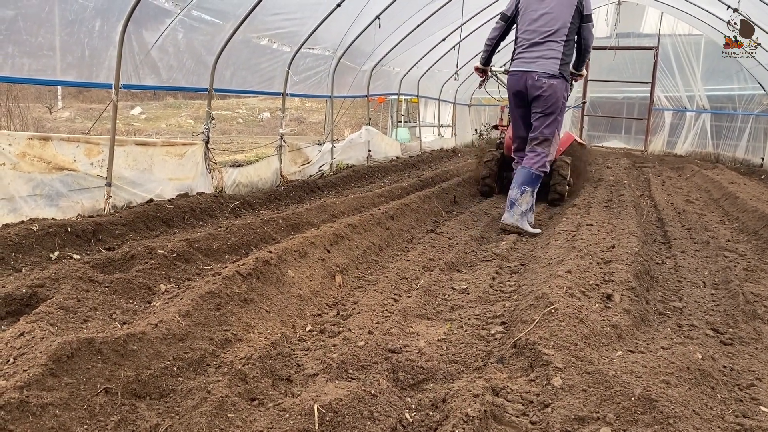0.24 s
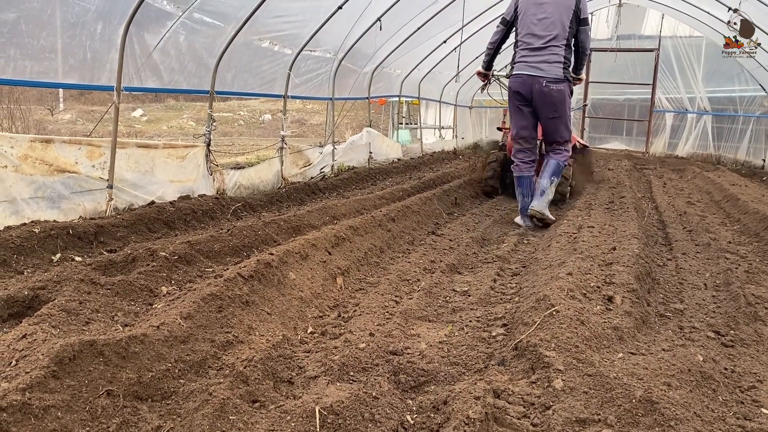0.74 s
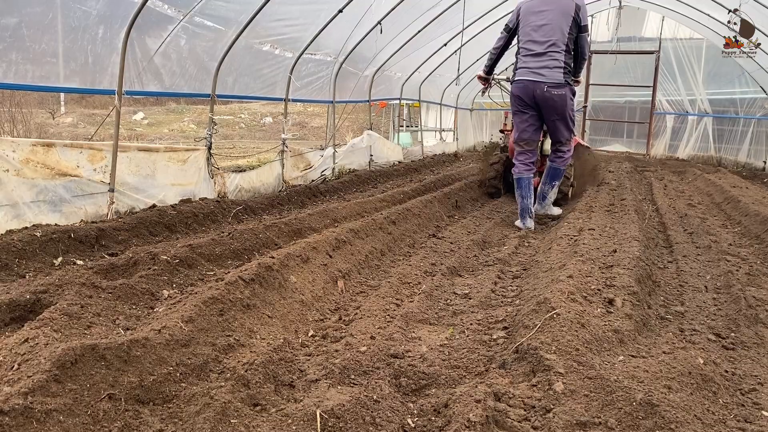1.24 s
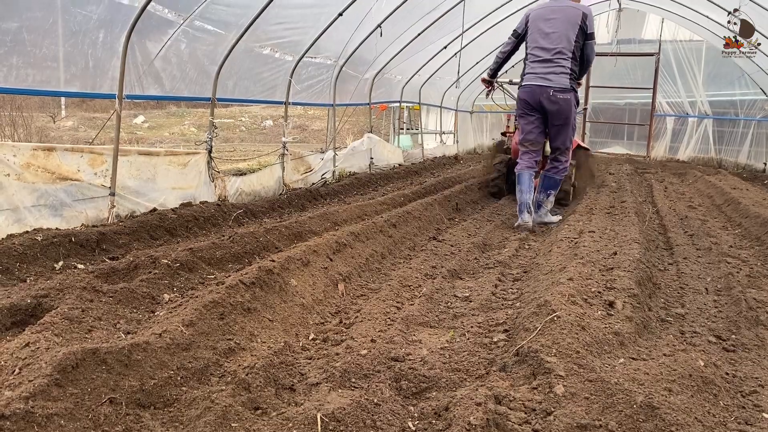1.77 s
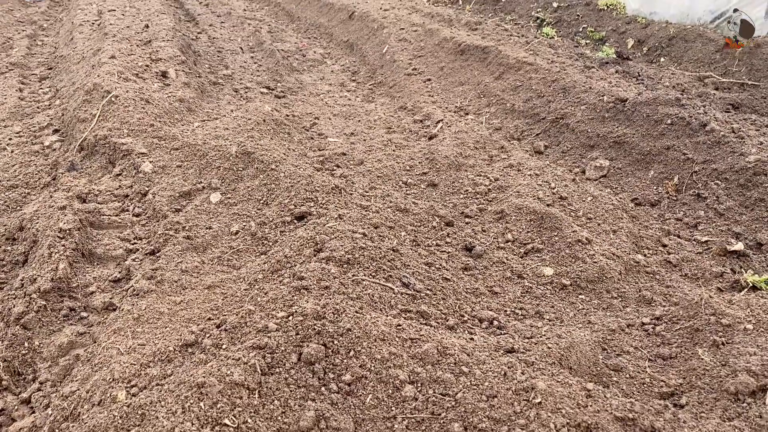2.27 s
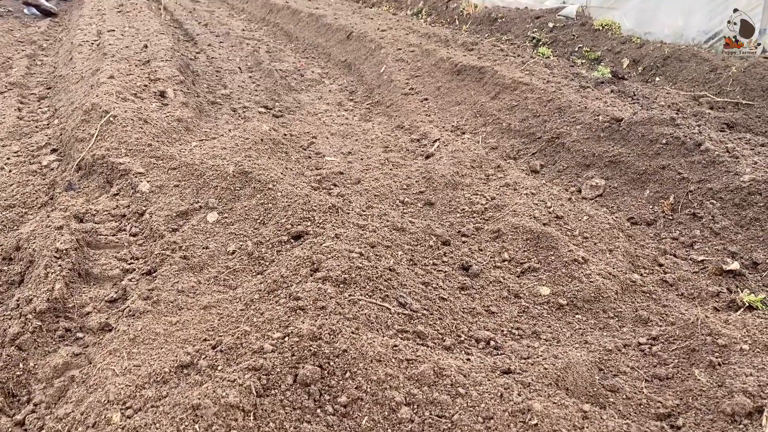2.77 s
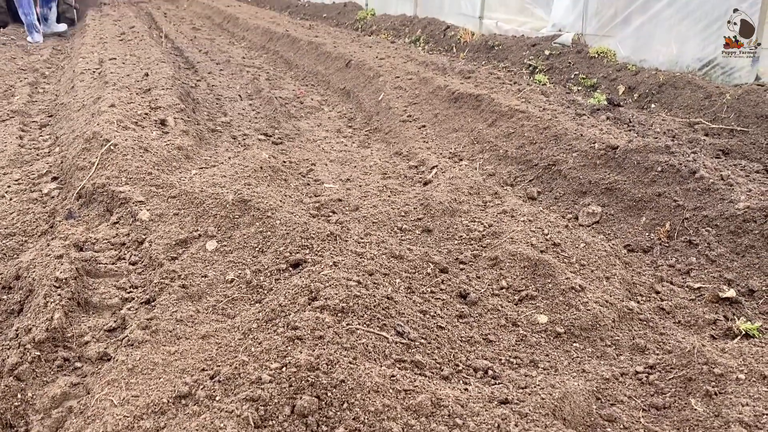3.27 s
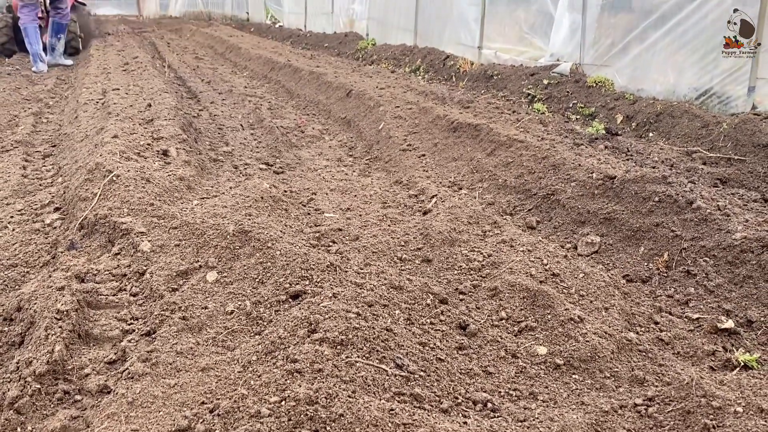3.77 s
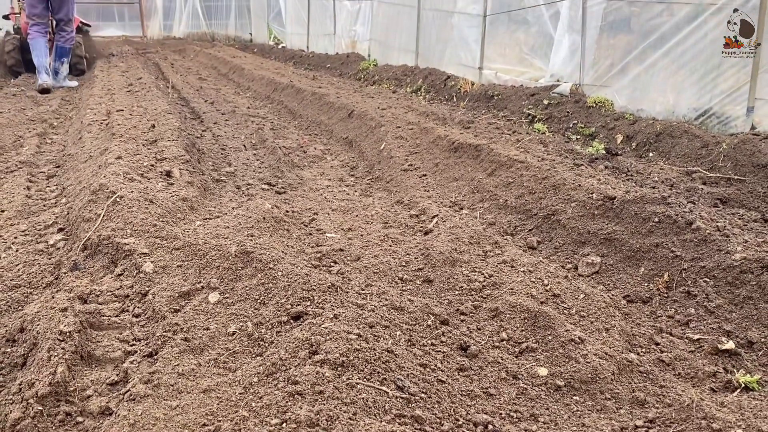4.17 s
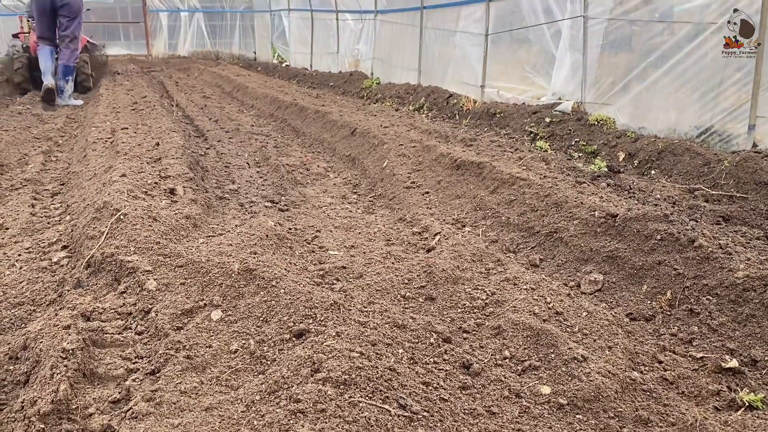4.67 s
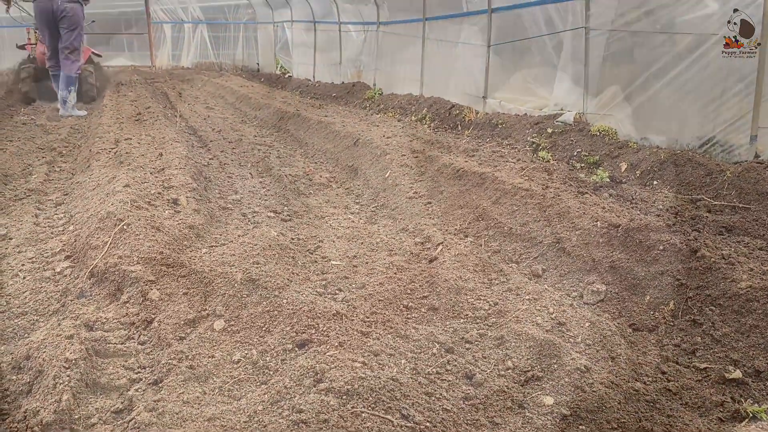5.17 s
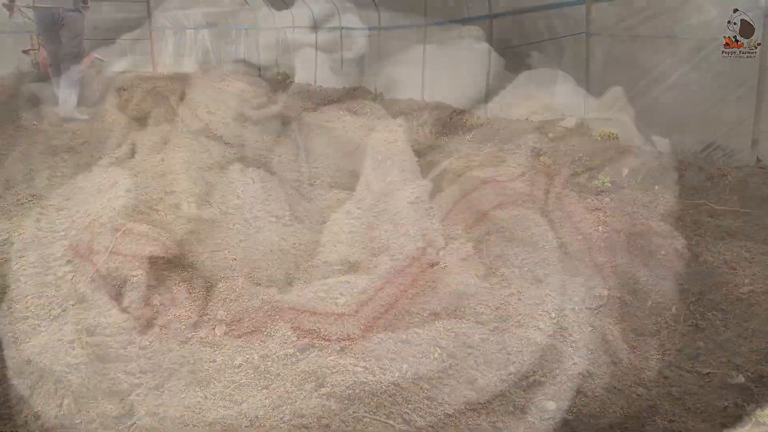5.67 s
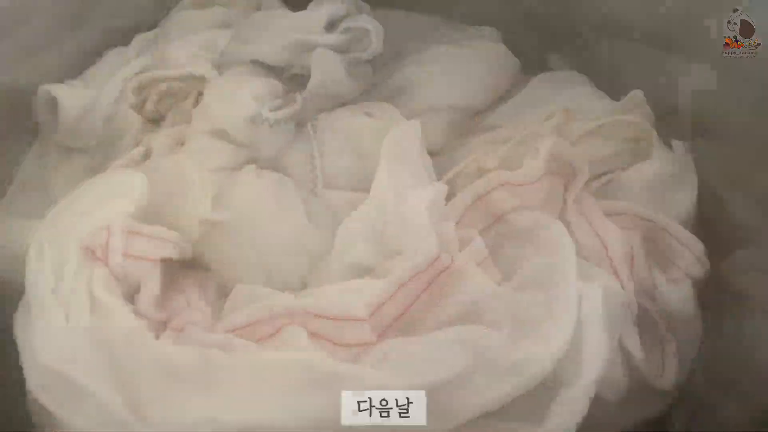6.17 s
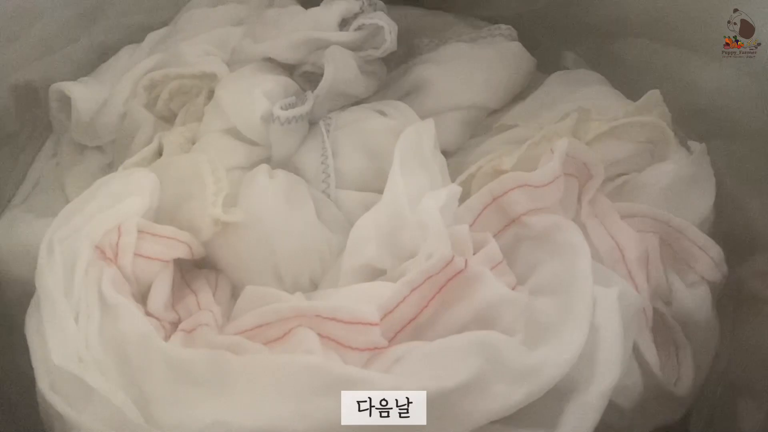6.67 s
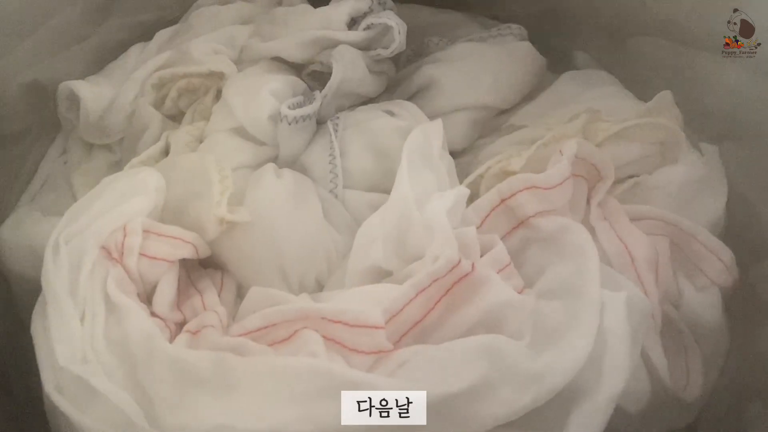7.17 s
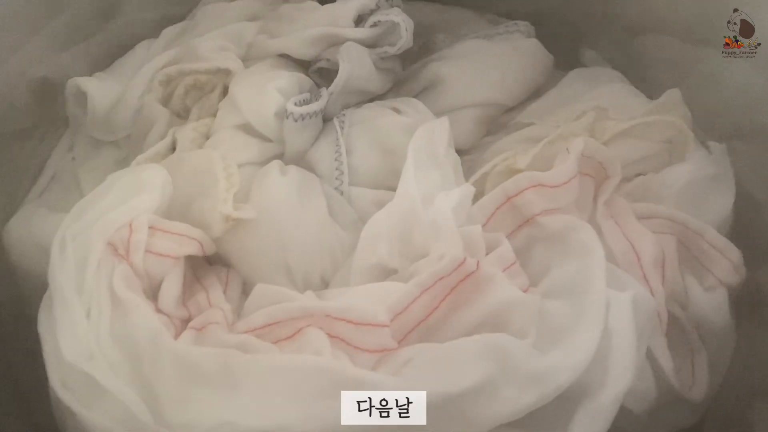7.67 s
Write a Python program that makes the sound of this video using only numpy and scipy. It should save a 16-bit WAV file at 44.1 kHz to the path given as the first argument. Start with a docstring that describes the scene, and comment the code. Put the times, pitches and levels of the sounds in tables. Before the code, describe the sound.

A one-cylinder petrol tiller runs steadily inside a plastic greenhouse, heard from behind: low rapid puttering, loose metal clatter, gas hiss, gear whine, small chirps and stones ticking on the tines. At about two seconds the view changes and it sounds a bit farther away, less hissy. At six seconds it stops at a cut, leaving a very quiet room with low appliance hum, airy noise and a few soft knocks.

```python
"""A plastic greenhouse: a one-cylinder four-stroke tiller works the soil, the microphone behind it, then, after
a cut, further off; a second cut leads to a quiet room with a humming appliance and soft knocks.
Each firing booms as an impulse through silencer and tunnel resonances; struck modes and pulsed noise make
block, clatter, casing and drone. Gas is puffing noise, gears whine as narrow noise and sung tones,
a belt chirps as a wavering sine, and stones on the tines are short noise bursts."""
import sys
import numpy as np
from scipy import signal
from scipy.fft import rfft, irfft, next_fast_len
from scipy.io import wavfile
from scipy.ndimage import uniform_filter1d

SR = 44100
rng = np.random.default_rng(int(sys.argv[2]) if len(sys.argv) > 2 else 0)


def store_pcm(level_fs):
    """Save levels as 16-bit WAV."""
    pcm = np.round(np.clip(level_fs, -1, 1) * 32767).astype(np.int16)
    wavfile.write(sys.argv[1], SR, np.atleast_2d(pcm).T)


N = 349256  # samples
T = np.arange(N) / SR
SIZE = next_fast_len(N + SR // 4)  # room after the end for ringing and delays
F = np.maximum(np.arange(SIZE // 2 + 1) * SR / SIZE, 1)  # Hz

# Start of each place [s]: near the tiller, far from it, in the room
PLACE_STARTS_S = (0, 2.062, 6.064)
# Span in which the room level dips by 30 dB [s]
DIP_S = (6.507, 6.528)
# All pairs of settings below are near, far.

# Mean firing rate as the soil load drifts, near and far: (time [s], rate [Hz])
FIRING_RATE = [
    [(0.0, 23.16), (0.55, 22.77), (0.71, 23.32), (1.07, 22.75), (1.33, 23.13), (1.48, 22.91), (2.05, 22.99)],
    [(2.08, 22.82), (2.69, 22.92), (2.84, 22.83), (3.03, 23.12), (3.52, 22.89), (4.19, 23.23),
     (4.57, 22.75), (4.84, 23.13), (5.43, 22.96), (5.58, 22.76), (6.05, 23.25)],
]
# Each bite of the tines drags the engine down sharply and lets it climb back
BITES_PER_S, BITE_SWING_HZ, BITE_SKEW_HZ = 3.044, 0.36, 0.14
BITE_TURN = (0.641, 0.144)  # share of the bite at 0 s
START_TURN = (0.287, 0.25)  # share of the engine cycle gone as each place starts

# Boom of silencer and tunnel, near and far: (frequency [Hz], width [Hz], level [dB], delay [ms])
BOOM_MODES = [
    [(50.3, 22.0, -48.4, 12.31), (101.6, 23.2, -31.3, 6.44), (135.8, 36.6, -35.1, 3.12),
     (175.0, 44.4, -42.3, 1.44), (219.4, 52.2, -39.6, 7.61), (276.2, 33.4, -49.2, 0.06),
     (325.1, 43.9, -60.9, 10.0)],
    [(47.9, 22.0, -49.8, 12.74), (109.8, 22.0, -30.6, 9.39), (129.1, 36.7, -32.9, 18.05),
     (215.0, 90.1, -50.7, 8.57), (234.0, 41.2, -44.6, 4.92), (274.0, 29.0, -50.3, 0.83),
     (349.4, 100.0, -59.6, 14.94)],
]
FIRING_DB = (0.65, 0.53)
# Block modes struck by valves and piston, near and far: (frequency [Hz], width [Hz], level [dB])
BLOCK_MODES = [
    [(532, 160, -69.5), (675, 38, -65), (966, 81, -57)],
    [(536, 85, -62), (703, 160, -67.5), (939, 84, -65.5)],
]
# Strikes of valves and piston: (point in the cycle [share], level [dB])
BLOCK_STRIKES = [(.10, 1.5), (0.582, -3.5)]

# Colour of the clatter, near and far: (frequency [Hz], relative level [dB per Hz])
CLATTER_COLOUR = [
    [(30, -22), (60, -2), (250, 3.5), (340, -5.5), (430, -13.5), (600, -2), (800, -2.5), (1300, 4),
     (2100, 3), (2800, -9.5), (4000, -50)],
    [(30, -16), (60, 4.5), (250, -7), (340, -1.5), (430, -25), (600, -3.5), (800, 0), (1300, 0),
     (2100, -4.5), (2800, -9.5), (4000, -36)],
]
CLATTER_DB = (-38.5, -39)
# Casing modes that rattle on and off, near and far: (frequency [Hz], width [Hz], level [dB rms])
CASING_MODES = [
    [(697, 79, -55), (1592, 190, -63), (2836, 430, -50.5), (4360, 70, -54), (6040, 73, -56.5),
     (7000, 200, -75), (7950, 100, -73), (8440, 47, -55), (10150, 120, -60), (12800, 300, -62),
     (15000, 250, -68)],
    [(535, 105, -55.5), (2518, 140, -52), (2863, 90, -53.5), (3686, 440, -52), (6130, 55, -63.5),
     (8080, 120, -62), (8550, 54, -64), (10120, 510, -62), (12080, 150, -65), (15200, 150, -82)],
]

# Colour of the gas hiss, near and far: (frequency [Hz], relative level [dB per Hz])
HISS_COLOUR = [
    [(1500, -7), (2800, -2), (4500, -6.5), (6000, -10), (8000, -11.5), (10500, -19), (15500, -22)],
    [(1500, -8), (2800, 1), (4000, -0.5), (5200, -3.5), (7500, -10), (10500, -18), (15500, -18.5)],
]
# Level of the hiss, near and far: (time [s], level [dB])
HISS_LEVEL = [
    [(0.0, -38), (0.2, -38), (0.43, -34.5), (0.52, -39), (1.2, -37), (1.7, -35.5), (1.85, -39),
     (2.06, -37.5)],
    [(2.07, -42.5), (4.0, -42), (6.06, -42)],
]

# Level of the cover drone, near and far: (time [s], level [dB])
DRONE_LEVEL = [
    [(0.0, -44.5), (0.85, -42.5), (1.4, -47.5), (1.6, -44), (2.06, -52)],
    [(2.07, -47), (2.6, -51.5), (4.8, -57), (5.0, -45), (5.3, -54), (5.7, -49), (6.06, -46)],
]
DRONE_HZ, DRONE_WANDER_DB = 990, 2.0

WHINE_HZ, WHINE_DB, WHINE_WANDER_DB = 1971, (-48, -48.5), 0.5
# Spells of clear gear tone, before flutter:
# (middle [s], length [s], frequency [Hz], level [dB rms])
GEAR_SINGING = [(0.3, 0.51, 1930, -44), (0.658, 0.21, 1990, -44.5), (3.28, 0.45, 1935, -42.5),
                (3.68, 0.2, 1975, -45), (3.9, 0.27, 1940, -44), (4.196, 0.32, 1960, -43),
                (4.52, 0.36, 1927, -45), (5.62, 0.2, 1920, -44)]

# Faint squeal that stays under the chirps
SQUEAL_HZ, SQUEAL_DB, SQUEAL_WANDER_DB = 6560, (-62, -65), 2
# Belt chirps, before flutter: (middle [s], length [s], level [dB])
BELT_CHIRPS = [(0.234, 0.09, -52), (0.48, 0.07, -55), (0.973, 0.05, -53), (1.388, 0.062, -43),
               (1.6, 0.06, -49), (1.702, 0.11, -52), (1.793, 0.039, -49), (2.494, 0.06, -52),
               (2.63, 0.07, -54), (2.813, 0.1, -55), (2.94, 0.05, -54), (3.378, 0.05, -54),
               (3.559, 0.067, -42.5), (3.684, 0.11, -46.5), (3.836, 0.18, -59), (4.167, 0.051, -58),
               (4.49, 0.091, -57), (5.402, 0.046, -56), (5.758, 0.14, -55)]

# Stones on the tines: (time [s], noise level at onset before the resonance [dB])
STONE_HITS = [(0.0423, -30), (0.0852, -35), (0.3531, -29), (0.4055, -28.5), (0.4704, -34), (0.5901, -29),
              (0.7407, -29.5), (0.8121, -38.5), (1.565, -29.5), (1.682, -25), (1.9135, -34), (3.3952, -29),
              (5.372, -38)]

# Colour of the room air: (frequency [Hz], relative level [dB per Hz])
AIR_COLOUR = [(40, -10), (90, -6), (125, 4.5), (180, -6.5), (300, -1), (600, -3), (1000, -10.5),
              (1800, -19), (2600, -17.5), (3100, -19.5), (3800, -17), (5500, -22.5), (6500, -27.5),
              (12000, -33.5), (16000, -40)]
AIR_DB = -60
# Appliance hum, around which its level wanders: (frequency [Hz], level [dB rms])
APPLIANCE_HUM = [(285.3, -64), (1427, -80)]
# Soft knocks in the room: (time [s], strike level before the modes [dB])
ROOM_KNOCKS = [(6.581, -51), (6.766, -52.5), (7.048, -60), (7.483, -50.5), (7.546, -50.5)]
# Modes that the knocks excite: (frequency [Hz], width [Hz], level [dB])
KNOCK_MODES = [(318, 180, -3.5), (734, 390, -2.5), (1400, 1100, -12)]
FAINT_KNOCKS_PER_S, FAINT_KNOCK_DB = 55, -67

# Between the microphone ports, for each of the three places:
# (frequency [Hz], likeness [0-1], left minus right [dB], left lead [rad])
MIC_PORTS = [
    [(250, 0.87, -1.5, 0.16), (690, 0.78, -1.5, 0.069), (1270, 0.65, 2.5, 0), (2800, 0.77, 2.5, 1),
     (5000, 0.48, 5, 0), (6880, 1, 0, 0.017)],
    [(61.5, 0.99, 1, 0), (247, 0.51, -6, 0.43), (703, 1, 6.5, 1), (1780, 0.23, -0.5, 3), (2670, 0.59, 1, 7),
     (5060, 0.84, 4.5, 5), (7110, 1, 0, 6)],
    [(60, 0.1, -2.5, 0), (348, 0.94, 2, 0), (1300, 0.2, 4, 1), (2800, 0.77, 4.5, .4), (5640, .6, 4.5, 0),
     (6960, 1, -0.5, 0)],
]
TREBLE_TURN_HZ = 4320  # above each table the right port gains a full turn of phase in this many Hz
TOP_HZ = 15800


def undb(db):
    """Amplitude factor for a level in dB."""
    return 10 ** (np.asarray(db) / 20)


def unit(x):
    """Scale to an rms of 1."""
    return x / np.sqrt(np.mean(x ** 2))


def curve(table):
    """Straight lines in time between the rows (time, value)."""
    s, value = np.transpose(table)
    return np.interp(T, s, value)


def over_hz(table):
    """Each column after the first, drawn over log frequency."""
    hz, *columns = np.transpose(table)
    return [np.interp(np.log(F), np.log(hz), column) for column in columns]


def shape(x, response):
    """Filter by multiplying the spectrum."""
    return irfft(rfft(x, SIZE) * response, SIZE)[..., :N]


def mode(hz, width_hz):
    """Band-pass resonance, gain 1 at the centre."""
    return 1 / (1 + 1j * (F / hz - hz / F) * hz / width_hz)


def struck_modes(table):
    """Sum of resonances, each passed twice for a soft onset."""
    return sum(undb(db) * mode(hz, width_hz) ** 2 for hz, width_hz, db in table)


def walk(rate):
    """Random levels held 1 / rate s and slewed twice; spread near 1."""
    k = int(SR / rate)
    steps = np.repeat(rng.standard_normal(N // k + 1), k)
    return 1.337 * uniform_filter1d(uniform_filter1d(steps, k), k)[:N]


def noise():
    """Two independent rows: what both ports share, and what only the right one hears."""
    return rng.standard_normal((2, N))


def tone(hz):
    """Sine that follows a moving frequency."""
    return np.sin(2 * np.pi * np.cumsum(hz) / SR)


def bump(turn, at, width):
    """A swell around one point of the cycle; at and width are shares of the cycle."""
    return np.exp((np.cos(2 * np.pi * (turn - at)) - 1) / (2 * np.pi * width) ** 2)


def swell(middle_s, length_s, db):
    """A smooth rise, hold and fall."""
    return undb(db) * np.exp(-(2 * (T - middle_s) / length_s) ** 4)


def engine_turns(place):
    """Firing rate under drifting soil load and tine bites, and the cycles it adds up to."""
    bite = 2 * np.pi * (BITES_PER_S * T + BITE_TURN[place])
    hz = curve(FIRING_RATE[place]) + BITE_SWING_HZ * np.sin(bite) - BITE_SKEW_HZ * np.sin(2 * bite)
    turns = np.cumsum(hz) / SR
    start = int(PLACE_STARTS_S[place] * SR)
    turns += START_TURN[place] + 200 - turns[start]  # 200 keeps the count positive
    return hz, turns


def firing_boom(place, hz, turns, strength):
    """One impulse per cycle of uneven strength rings the delayed modes of silencer and tunnel."""
    cycle, turn = turns.astype(int), turns % 1
    fires = np.diff(cycle, prepend=cycle[0])
    firing = np.zeros(SIZE)
    firing[:N] = fires * SR / hz * undb(FIRING_DB[place] + 0.6 * strength)
    # the firing before the first sample still rings: the filter wraps round
    firing[-int(turn[0] * SR / hz[0])] = SR / hz[0]
    response = 0
    for mode_hz, width_hz, db, delay_ms in BOOM_MODES[place]:
        delay = np.exp(-2j * np.pi * F * delay_ms / 1000)
        response = response + undb(db) * mode(mode_hz, width_hz) ** 2 * delay
    return shape(firing, response)


def block_strikes(place, hz, turns):
    """Valves and piston strike the block modes on both crank turns of the cycle, with jitter."""
    strikes = np.zeros(N)
    for at, db in BLOCK_STRIKES:
        before = turns[0] // 1 - (turns[0] % 1 < at)
        count = np.floor(turns - at - 0.0051 * walk(20))
        strikes += np.diff(count, prepend=before) * undb(db)
    blows = np.maximum(strikes, 0) * SR / hz * undb(1.25 * walk(40))
    return shape(blows, struck_modes(BLOCK_MODES[place]))


def loose_clatter(place, knock, grit):
    """Coloured grainy noise that the strikes lift twice a cycle."""
    flicker = undb(0.92 * walk(12) + 1.22 * walk(350))
    shaken = knock * flicker * grit * noise()
    return undb(CLATTER_DB[place]) * unit(shape(shaken, undb(over_hz(CLATTER_COLOUR[place])[0])))


def casing_rattle(place, knock):
    """Shaken noise through each casing mode; higher modes come and go more widely."""
    rattle = np.zeros((2, N))
    for hz, width_hz, db in CASING_MODES[place]:
        shaken = knock * undb(min(hz / 600, 2.8) * walk(24)) * noise()
        rattle += undb(db) * unit(shape(shaken, mode(hz, width_hz) ** 2))
    return rattle


def gas_hiss(place, turn, grit, puff_chance, late_chance, spit_chance):
    """Gas noise swells at two points of the cycle, some puffs harder, with a bright valve spit."""
    puff = (1 + 0.5 * undb(4.1 * puff_chance) * bump(turn, 0.35, 0.13)
            + 0.25 * undb(9.8 * late_chance) * bump(turn, 0.71, 0.076))
    colour = undb(over_hz(HISS_COLOUR[place])[0])
    gas = shape(puff * grit * undb(0.37 * walk(8.85)) * noise(), colour)
    # the exhaust valve cracks open with a short bright spit
    opening = undb(3.7 * spit_chance) * bump(turn, 0.33, 0.067)
    spit = shape(opening * noise(), colour * mode(13200, 9000))
    return undb(curve(HISS_LEVEL[place])) * unit(gas + undb(11.5) * spit)


def cover_drone(place, knock):
    """The strikes shake noise through one cover resonance whose level wanders."""
    level = undb(curve(DRONE_LEVEL[place]) + DRONE_WANDER_DB * walk(5.45))
    return level * unit(shape(knock * noise(), mode(DRONE_HZ, 126) ** 2))


def gear_whine(place):
    """Gears whine as narrow-band noise and in spells sing a wavering, fluttering tone."""
    band = mode(WHINE_HZ, 41) + 0.23 * mode(0.99 * WHINE_HZ, 130)
    level = undb(WHINE_DB[place] + WHINE_WANDER_DB * walk(5.84))
    whine = level * unit(shape(noise(), band))
    waver_hz = 7 * walk(30)
    flutter = np.sqrt(2) * undb(3.0 * walk(46))  # the root turns rms into peak
    for middle_s, length_s, hz, db in GEAR_SINGING:
        whine[0] += flutter * swell(middle_s, length_s, db) * tone(hz + waver_hz)
    return whine


def belt_squeal(place):
    """The slipping belt is a high wavering sine, faint throughout and swelling into chirps."""
    slip = undb(SQUEAL_DB[place] + SQUEAL_WANDER_DB * walk(12))
    slip = slip + sum(swell(*chirp) for chirp in BELT_CHIRPS)
    return slip * undb(2.5 * walk(43)) * tone(SQUEAL_HZ + 12 * walk(30))


def stones_on_tines():
    """Each stone starts a noise burst that falls 60 dB in 88 ms, through a broad resonance."""
    envelope = np.zeros(N)
    for s, db in STONE_HITS:
        envelope += undb(db) * (T >= s) * np.exp(-np.log(1000) * np.abs(T - s) / 0.088)
    return shape(envelope * noise(), mode(4400, 4000))


def microphone_ports(pair, table):
    """The right port hears a shifted share of the left signal, filled up with sound of its own."""
    likeness, pan_db, lead = over_hz(table)
    likeness = np.clip(likeness, 0, 1)
    lead = lead - 2 * np.pi * np.maximum(F - table[-1][0], 0) / TREBLE_TURN_HZ
    right_gain = undb(-pan_db)
    shared = shape(pair[0], likeness * np.exp(-1j * lead) * right_gain)
    own = shape(pair[1], np.sqrt(1 - likeness ** 2) * right_gain)
    return np.array([pair[0], shared + own])


def tiller(place):
    """The whole machine at the microphone ports: place 0 is near and behind it, place 1 further off."""
    hz, turns = engine_turns(place)
    cycle, turn = turns.astype(int), turns % 1
    # four chances drawn anew for each cycle: firing, two puffs and the spit
    draws = np.clip(rng.standard_normal((cycle[-1] + 1, 4)), -1.7, 1.7)
    strength, puff_chance, late_chance, spit_chance = draws[cycle].T
    # the strikes on both crank turns shake everything loose
    knock = 1 + 0.18 * bump(turn, 0.13, 0.017) + 0.085 * bump(turn, 0.68, 0.073)
    # soil and loose parts make the noise grainy
    grit = undb(np.minimum(2.77 * rng.exponential(size=N), 11))
    pair = loose_clatter(place, knock, grit) + casing_rattle(place, knock)
    pair += gas_hiss(place, turn, grit, puff_chance, late_chance, spit_chance)
    pair += cover_drone(place, knock) + gear_whine(place)
    pair += block_strikes(place, hz, turns) + belt_squeal(place) + stones_on_tines()
    pair[0] += firing_boom(place, hz, turns, strength)
    return microphone_ports(pair, MIC_PORTS[place])


def room_air():
    """Coloured noise in half-octave bands, each flickering by itself."""
    colour = undb(over_hz(AIR_COLOUR)[0])
    air = np.zeros((2, N))
    for hz in 50 * 2 ** np.arange(0, 8.5, 0.5):
        flicker = undb(min(900 / hz, 2.4) * walk(22))
        air += shape(flicker * noise(), colour * mode(hz, hz / 2))
    return undb(AIR_DB) * unit(air)


def appliance_hum():
    """Steady sines with slight wander of level and phase."""
    hum = np.zeros(N)
    for hz, db in APPLIANCE_HUM:
        phase = 2 * np.pi * hz * T + 0.25 * walk(9)
        hum += undb(db + 0.67 * walk(4.6)) * np.sqrt(2) * np.sin(phase)
    return hum


def room_knocks():
    """Single blows and a scatter of faint ones ring short broad modes."""
    s, strike_db = np.transpose(ROOM_KNOCKS)
    faint = rng.random(N) < FAINT_KNOCKS_PER_S / SR
    blows = faint * undb(FAINT_KNOCK_DB + 1.5 * walk(3.7)) * rng.uniform(-1, 1, N)
    blows[(s * SR).astype(int)] = undb(strike_db)
    # SR / width makes up for the small energy of one sample in a narrow band
    response = sum(undb(db) * mode(hz, width_hz) ** 2 * SR / width_hz for hz, width_hz, db in KNOCK_MODES)
    return shape(blows, response)


def room():
    """Air, hum and knocks at the microphone ports; the level dips once, briefly."""
    pair = room_air()
    pair[0] += appliance_hum() + room_knocks()
    dip = np.where((T > DIP_S[0]) & (T < DIP_S[1]), undb(-30), 1)
    return microphone_ports(pair, MIC_PORTS[2]) * dip


def scene():
    """Near the tiller, far from it, then the room, joined by 6.1 ms fades."""
    far, indoors = [np.clip((T - s) / 0.0061 + 0.5, 0, 1) for s in PLACE_STARTS_S[1:]]
    return (1 - far) * tiller(0) + (far - indoors) * tiller(1) + indoors * room()


def record(dry):
    """The recorder cuts the top with a steep elliptic low-pass."""
    low_pass = signal.ellip(10, 0.2, 80, TOP_HZ, fs=SR, output="sos")
    return signal.sosfilt(low_pass, dry)


dry = scene()
out = record(dry)
store_pcm(out)
```